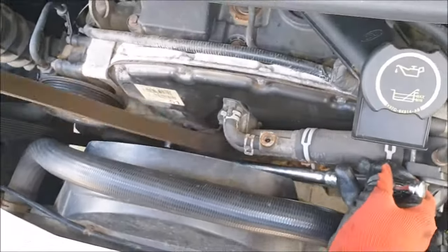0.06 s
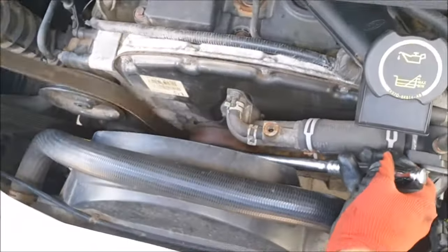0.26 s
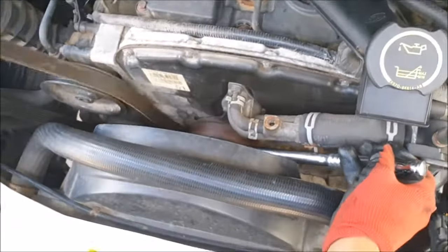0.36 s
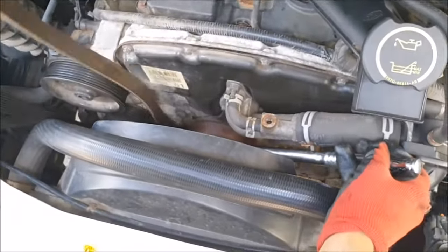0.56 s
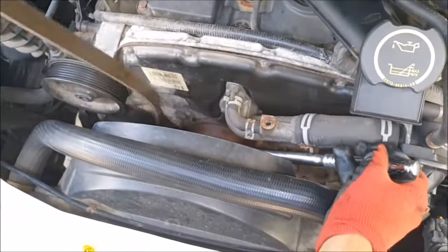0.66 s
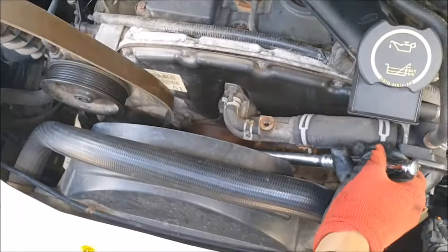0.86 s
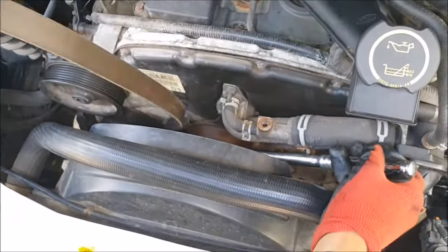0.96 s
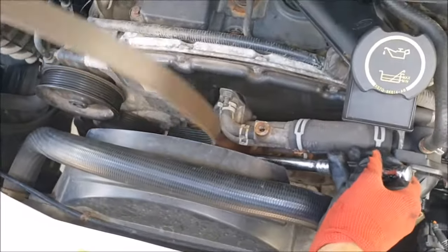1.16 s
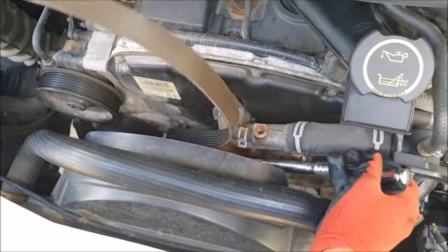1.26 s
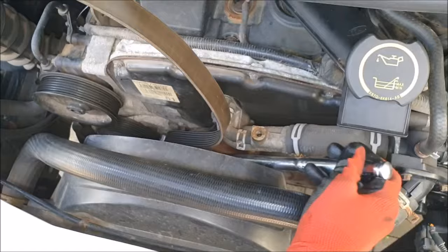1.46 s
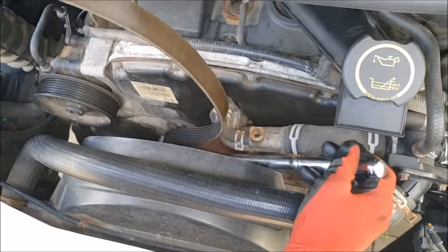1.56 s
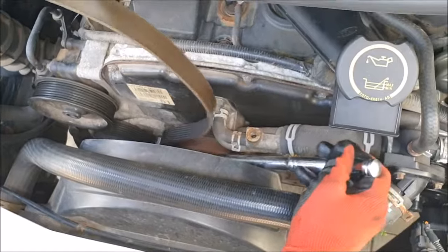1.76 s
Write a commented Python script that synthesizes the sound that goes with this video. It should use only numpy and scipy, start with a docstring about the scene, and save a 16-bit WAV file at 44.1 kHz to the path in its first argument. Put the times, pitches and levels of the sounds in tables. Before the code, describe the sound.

A rubber belt scrapes, snaps loudly against metal, then flutters and slides softly.

```python
"""In the engine bay of a stopped engine, outdoors, a slack rubber drive belt is pulled out.
It scrapes and squeaks over a pulley, catches, then snaps free against metal and a plastic cover.
The loose belt flutters, then slides on with a hiss and a few soft knocks and twangs.
The bay rings briefly around a close pair of microphones, over a low outdoor rumble."""
import sys
import numpy as np
from scipy import signal
from scipy.fft import rfft, irfft, next_fast_len
from scipy.io import wavfile
from scipy.ndimage import map_coordinates

SR = 44100
rng = np.random.default_rng(int(sys.argv[2]) if len(sys.argv) > 2 else 0)


def store_wav(level_fs):
    """Save 16-bit WAV to argv[1]."""
    pcm = np.round(np.clip(np.atleast_2d(level_fs), -1, 1) * 32767)
    wavfile.write(sys.argv[1], SR, pcm.T.astype(np.int16))


N = 79380  # 1.8 s

# Levels are relative. A fade time (t60) is how long a sound takes to drop by 60 dB.
# tone colour of each noise (frequency [Hz], level [dB])
RUMBLE_COLOUR = [(13, -59), (22, -25.5), (50, -7), (70, 0), (129, -9.5), (202, -8.5), (232, -15),
                 (272, -10.5), (480, -23.5), (607, -22.5), (992, -30.5), (1090, -35.5), (2130, -46.5),
                 (2400, -57), (3120, -72), (5280, -120)]
HISS_COLOUR = [(800, -13), (2300, -9.5), (3200, -0.5), (5000, 2.5), (6900, -1), (8100, -30.5), (10000, -30),
               (16000, -47.5)]
FIZZ_COLOUR = [(2000, -22), (7000, 2.5), (8400, -10.5), (10800, -1.5), (14000, -4), (16000, -8)]
WHUMP_COLOUR = [(25, -20), (60, -11), (150, 5), (230, -3), (330, -11), (450, -16), (1000, -28.5),
                (4000, -55)]
SCRAPE_COLOUR = [(300, -37), (700, -5), (1900, 1), (2500, -9.5), (3200, 1), (4700, -2.5), (6500, -7),
                 (8500, -16.5), (12000, -9), (16000, -12)]
THUD_COLOUR = [(60, -3), (250, 3), (420, -5.5), (700, 3.5), (1200, -7.5), (1800, -3.5), (2800, -14.5),
               (6000, -23.5), (16000, -50)]
CLATTER_COLOUR = [(200, -21), (1200, -13), (2200, -11), (3000, -5.5), (3800, -5.5), (5200, -5),
                  (6700, -6.5), (9000, -23), (11000, -21), (16000, -24)]
TICK_COLOUR = [(1000, -31), (6000, -7.5), (9000, -18.5), (10600, 0), (11800, -4.5), (13000, 0),
               (16000, -12)]
# how alike a noise is on the left and right (frequency [Hz], likeness [0 to 1])
LIKENESS = [(60, 0.98), (130, 0.98), (290, 0.87), (640, 0.25), (1400, 0), (15000, 0.046)]
# how the two microphones differ (frequency [Hz], left over right [dB])
MIC_BALANCE = [(60, 0.5), (300, 0), (700, 2), (1200, 5), (2000, 0.5), (5500, -4), (7500, 2), (9000, 1.5),
               (12000, 0.5)]
# echo of the engine bay (frequency [Hz], fade time [s])
BAY_FADE = [(150, 0.13), (800, 0.42), (3000, 0.23), (6000, 0.089), (14000, 0.19)]
# loudness of the sliding hiss, its high fizz and the first pull (time [s], level [dB])
HISS_LEVEL = [(0.36, -63.5), (0.388, -73), (0.448, -60), (0.648, -63), (0.66, -61), (0.732, -69),
              (0.86, -64), (0.924, -70.5), (0.972, -63.5), (1.122, -72), (1.166, -60.5), (1.31, -72),
              (1.334, -67), (1.714, -67.5), (1.766, -75.5), (1.8, -62.5)]
FIZZ_LEVEL = [(0.28, -56), (0.33, -60.5), (0.384, -74), (0.432, -69), (0.448, -59), (0.576, -73),
              (0.676, -64), (0.778, -76), (1.16, -74.5), (1.168, -68), (1.286, -76.5), (1.368, -67.5),
              (1.544, -79), (1.63, -64), (1.778, -77), (1.8, -76)]
PULL_LEVEL = [(0, -60), (.08, -60.5), (.105, -49), (.125, -48.5), (.145, -43.5), (.175, -45), (.195, -55),
              (.218, -54.5), (.25, -69)]
# scuffs of the belt's edge (time [s], level [dB], pitch [Hz], half-width [Hz], half-length [s])
SCUFFS = [(.013, -58.5, 4900, 600, 0.0064), (.014, -58.5, 3420, 200, .005),
          (.105, -46.5, 4850, 600, 0.0071), (.143, -51, 4300, 400, 0.0041), (0.866, -54.5, 2940, 250, .006),
          (0.87, -64, 2130, 120, 0.01), (.974, -52.5, 2880, 259, 0.0026), (1.349, -60, 3800, 402, 0.012),
          (1.445, -66, 4940, 500, 0.022), (1.545, -61.5, 3360, 356, 0.024),
          (1.684, -61.5, 6500, 600, 0.021)]
# slow swings of the slack belt (time [s], level [dB])
SWAYS = [(.36, -36), (0.443, -49), (0.899, -50.5), (1.115, -49.5), (1.306, -43.5), (1.685, -39)]
# belt ribs slipping on the pulley (time [s], rate [slips per second])
RIB_RATE = [(.09, 880), (.11, 1300), (.13, 2200), (.15, 2400), (.18, 2500)]
# twangs of the struck belt (time [s], level [dB], starting pitch [Hz])
TWANGS = [(.972, -43, 433), (1.1585, -33, 690), (1.16, -34.5, 215)]
# ringing tones of the plastic cover (pitch [Hz], level [dB], fade time [s])
COVER_TONES = [(199.4, -15.5, 0.072), (342.7, -18.5, 0.21), (593, -9, .04), (694, -2.5, 0.1),
               (886, -6, .05), (1376, -14.5, 0.064)]
# rubber landing on the cover (time [s], thud [dB], ring [dB], left over right [dB])
KNOCKS = [(.146, -38, -45, 9), (.1655, -36.5, -64, 5), (.175, -46, -48, -3), (.2235, -35, -39, 4.5),
          (.256, -33, -29, 7), (.264, -32.5, -26, 8), (.481, -53.5, -66, 7), (.51, -50.5, -84, 8.5),
          (.971, -47, -50, 2), (1.001, -39, -60, 4.5), (1.158, -36.5, -43, 2), (1.273, -52, -51.5, -2),
          (1.491, -58.5, -49.5, 6)]
# ringing tones of the pulley and brackets (pitch [Hz], level [dB])
METAL_TONES = [(1771, -11), (2400, -5), (2573, -1), (3355, -11), (3770, 1), (3962, 5), (4190, -3),
               (4560, 6.5), (5252, 0.5), (6378, -4), (7590, -5)]
# bright ticks as the belt catches and lets go (time [s], level [dB])
TICKS = [(0.2228, -24), (0.2473, -33.5), (0.255, -21)]
# hard hits on metal (time [s], crack [dB], crack pitch [Hz], clatter [dB], clatter fade time [s],
# ring [dB], left over right [dB])
SNAPS = [(0.1641, -30, 4230, -30, 0.026, -48, -2), (0.2235, -18, 10950, -29, 0.062, -54, 0),
         (.246, -2, 5200, -12.5, .015, -36, -4), (0.2527, -23.5, 4600, -22, 0.045, -57, 6),
         (0.2555, -5.5, 4580, -16.5, 0.032, -26, -1.5), (0.2624, -23, 5220, -28, 0.039, -37, -3),
         (0.321, -49, 3600, -45, 0.058, -64, 10), (.589, -51.5, 4500, -50, 0.018, -69, 9),
         (.662, -38, 5850, -42.5, 0.019, -68, -3)]


def amp(db):
    """Turn decibels into a gain to multiply by."""
    return 10 ** (np.asarray(db) / 20)


def unit(x):
    """Scale a sound to an average (rms) strength of 1."""
    return x / np.sqrt(np.mean(x ** 2) + 1e-20)


def along(points, hz):
    """Look up a (frequency [Hz], value) table on a log frequency scale."""
    freqs, values = np.transpose(points)
    return np.interp(np.log(hz + 1), np.log(freqs + 1), values)


def clock():
    """The time of each sample in seconds."""
    return np.arange(N) / SR


def curve(rows):
    """Join (time [s], value) points with straight lines."""
    return np.interp(clock(), *np.transpose(rows))


def wobble(rate):
    """A smooth curve through `rate` random values a second."""
    return map_coordinates(rng.standard_normal(N // 4), [clock() * rate], mode="wrap")


def bump(s, half_length):
    """A smooth swell centred on time s."""
    return np.exp(-((clock() - s) / half_length) ** 2 / 2)


def decay(s, t60, attack_s):
    """A quick rise at time s, then a fade."""
    t = np.maximum(clock() - s, 0)
    return (1 - np.exp(-t / attack_s)) * np.exp(-np.log(1000) * t / t60)


def pan(db):
    """Two gains that make the left louder than the right by db."""
    return amp(np.array([[db], [-db]]) / 2)


def add(out, s, x):
    """Mix x into out from time s."""
    part = out[..., max(round(s * SR), 0):][..., :x.shape[-1]]
    part += x[..., :part.shape[-1]]


def filtered(x, response):
    """Scale each frequency in x by the gain response(hz)."""
    size = next_fast_len(N + SR // 4)
    return irfft(rfft(x, size) * response(np.fft.rfftfreq(size, 1 / SR)), size)[..., :N]


def noise(colour):
    """Stereo noise whose two sides are alike in the bass and unrelated in the treble."""
    def gains(hz):
        angle = np.arccos(np.clip(along(LIKENESS, hz), -1, 1)) / 2
        return amp(along(colour, hz)) * [np.cos(angle), np.sin(angle)]
    mid, side = filtered(rng.standard_normal((2, N)), gains)
    return unit(np.array([mid + side, mid - side]))


def narrow_noise(centre_hz, half_width_hz):
    """Stereo noise gathered around one pitch."""
    white = rng.standard_normal((2, N))
    return unit(filtered(white, lambda hz: 1 / (1 + ((hz - centre_hz) / half_width_hz) ** 2)))


def ring(tones, phase_spread):
    """A struck part rings; each tone reaches each microphone at a different point in its wave."""
    t = np.arange(SR // 4) / SR
    out = 0
    for hz, db, t60 in tones:
        fade = amp(db + rng.normal(0, 0.66)) * np.exp(-np.log(1000) * t / t60)
        out += fade * np.sin(2 * np.pi * hz * t + phase_spread * rng.standard_normal((2, 1)))
    return out * (1 - np.exp(-t / 0.0018))


def rumble():
    """The steady low rumble of the outdoors."""
    return amp(-49.5) * pan(db=3.5) * noise(RUMBLE_COLOUR)


def bay_echo(x):
    """The engine bay answers x with a short echo; each frequency fades at its own speed."""
    hz, t, spectrum = signal.stft(rng.standard_normal((2, SR // 2)), SR, nperseg=256)
    fade = np.exp(-np.log(1000) * t / along(BAY_FADE, hz)[:, None])
    tail = signal.istft(spectrum * fade, SR, nperseg=256)[1]
    return signal.fftconvolve(x, tail / np.linalg.norm(tail[0]), axes=1)[:, :N]


def slide(free_s):
    """The slack belt hisses along hoses and housings, its edge scuffing now and then."""
    hiss = amp(curve(HISS_LEVEL)) * noise(HISS_COLOUR)
    fizz = amp(curve(FIZZ_LEVEL)) * noise(FIZZ_COLOUR) * (clock() > free_s)
    scuffs = sum(amp(db) * bump(s, half_length) * narrow_noise(hz, half_width)
                 for s, db, hz, half_width, half_length in SCUFFS)
    return amp(3.0 + 1.2 * wobble(120)) * (hiss + fizz) + scuffs


def flutter(free_s):
    """The freed belt flaps ever more slowly, then swings slack and pushes the air."""
    flap_hz, sag_hz_per_s, end_s, sway_hz = 116, 170, .385, 64.8
    t = clock() - free_s
    swell = np.clip(t / 0.032, 0, 1) * np.clip((end_s - clock()) / 0.051, 0, 1)
    phase = 2 * np.pi * (flap_hz * t - sag_hz_per_s * t ** 2 / 2)
    flap = amp(-38.5) * unit(np.sin(phase) + amp(-8.5) * np.cos(2 * phase))
    whump = amp(-42) * noise(WHUMP_COLOUR)
    sways = sum(amp(db) * bump(s, 0.017) * np.cos(2 * np.pi * sway_hz * (clock() - s))
                for s, db in SWAYS)
    return pan(db=3) * (swell * (flap + whump) + sways)


def pull():
    """The belt scrapes over the pulley with a hoarse squeak; its slipping ribs make a rising zip."""
    squeak_end_s, zip_start_s, end_s = .165, RIB_RATE[0][0], PULL_LEVEL[-1][0]
    t = clock()
    scrape = unit(noise(SCRAPE_COLOUR) * amp(2.2 * wobble(300)))
    squeak = narrow_noise(centre_hz=3170, half_width_hz=170) * np.clip((squeak_end_s - t) / .01, 0, 1)
    slip_hz = curve(RIB_RATE) * (1 + 0.082 * wobble(900))
    roughness = amp(4 * wobble(220))
    zipping = unit(np.sin(2 * np.pi * np.cumsum(slip_hz) / SR) * roughness) * (t > zip_start_s)
    return amp(curve(PULL_LEVEL)) * (scrape + amp(-3) * squeak + amp(-11) * zipping) * (t < end_s)


def twangs():
    """The struck belt twangs briefly, its pitch sinking as it slackens."""
    sag_per_s = 8
    out = np.zeros(N)
    for s, db, start_hz in TWANGS:
        hz = start_hz / (1 + sag_per_s * np.maximum(clock() - s, 0)) * (clock() > s)
        out += amp(db) * decay(s, t60=.065, attack_s=0.00035) * np.sin(2 * np.pi * np.cumsum(hz) / SR)
    return pan(db=6) * out


def knocks():
    """Rubber lands on the plastic cover: a dull thud and a short hollow ring."""
    out, thud = np.zeros((2, N)), noise(THUD_COLOUR)
    for s, thud_db, ring_db, pan_db in KNOCKS:
        hit = amp(thud_db) * decay(s, t60=0.053, attack_s=.0008) * thud
        add(hit, s, amp(ring_db) * ring(COVER_TONES, phase_spread=0.66))
        out += pan(pan_db) * hit
    return out


def crack(s, hz):
    """A stiff part shakes a few times and stops within a millisecond."""
    rise_s = 0.00021
    t = np.maximum(clock() - s, 0)
    swell = (t / rise_s * np.exp(1 - t / rise_s)) ** 2
    return swell * np.sin(2 * np.pi * hz * t)


def snaps():
    """The belt whips metal: sharp cracks, a dense clatter, ringing tones and bright ticks."""
    right_lag_s, metal_t60 = 0.0001855, .065  # the right microphone hears each crack later
    metal = [(hz, db, metal_t60) for hz, db in METAL_TONES]
    out, clatter = np.zeros((2, N)), noise(CLATTER_COLOUR)
    for s, crack_db, crack_hz, clatter_db, t60, ring_db, pan_db in SNAPS:
        hit = amp(clatter_db) * decay(s, t60, attack_s=0.00036) * clatter
        hit += amp(crack_db) * np.array([crack(s, crack_hz), crack(s + right_lag_s, crack_hz)])
        add(hit, s, amp(ring_db) * ring(metal, phase_spread=0.67))
        out += pan(pan_db) * hit
    tick_gain = sum(amp(db) * decay(s, t60=0.021, attack_s=0.00066) for s, db in TICKS)
    return out + tick_gain * noise(TICK_COLOUR)


def scene():
    """Mix the rumble and the belt; only the hits, twangs and pull get the bay's echo."""
    free_s = .255  # the belt comes free
    belt = snaps() + knocks() + twangs() + pull()
    return rumble() + amp(-15) * bay_echo(belt) + flutter(free_s) + slide(free_s) + belt


def record(dry):
    """The two microphones differ in tone; the tallest peaks are clipped and the top treble is cut."""
    top_hz = 15800
    heard = filtered(dry, lambda hz: amp(np.outer([.5, -.5], along(MIC_BALANCE, hz))))
    clipped = np.clip(heard, -.93, .93)
    return filtered(clipped, lambda hz: 1 / (1 + (hz / top_hz) ** 120))


dry = scene()
out = record(dry)
store_wav(out)
```